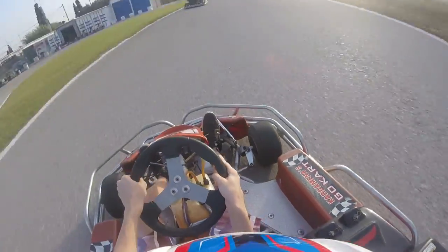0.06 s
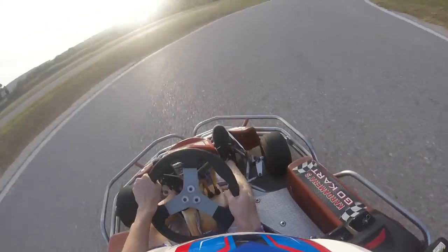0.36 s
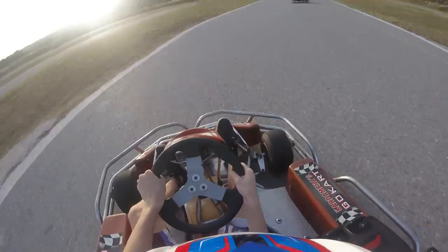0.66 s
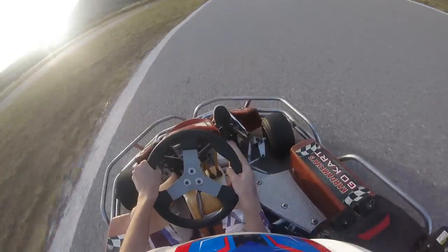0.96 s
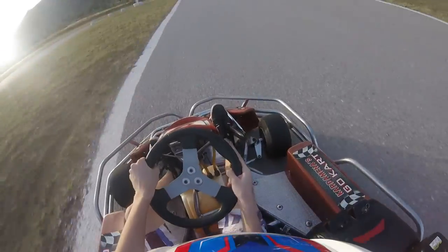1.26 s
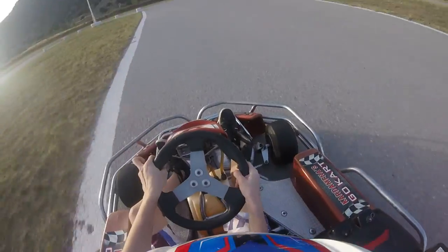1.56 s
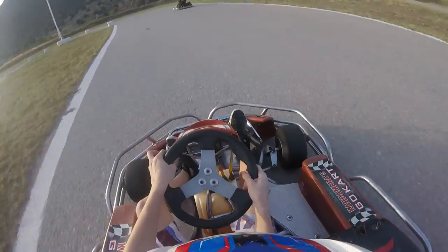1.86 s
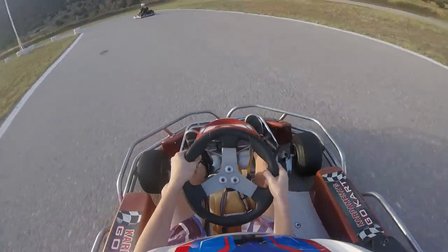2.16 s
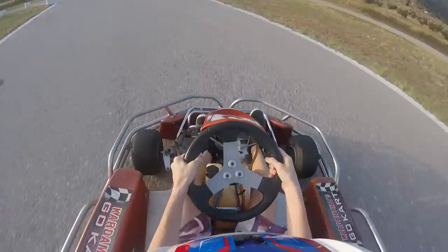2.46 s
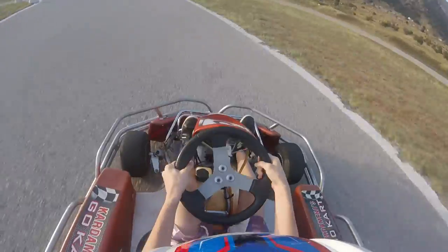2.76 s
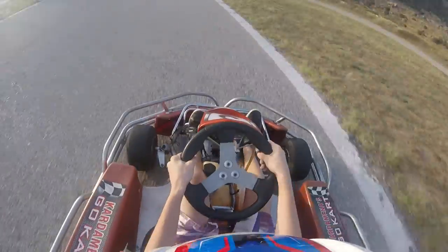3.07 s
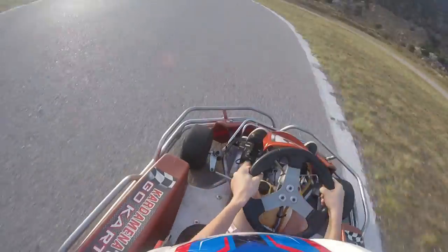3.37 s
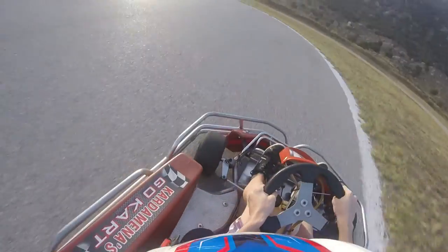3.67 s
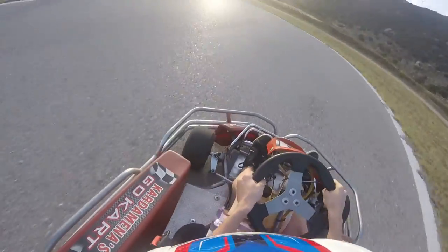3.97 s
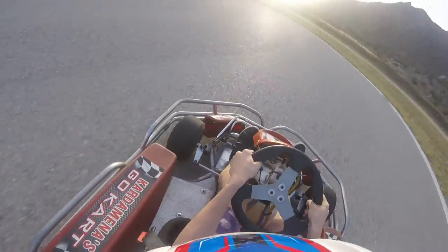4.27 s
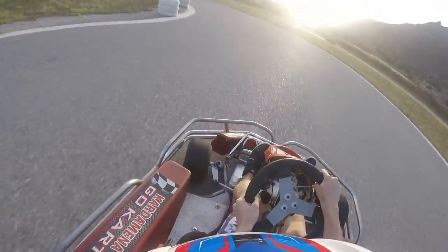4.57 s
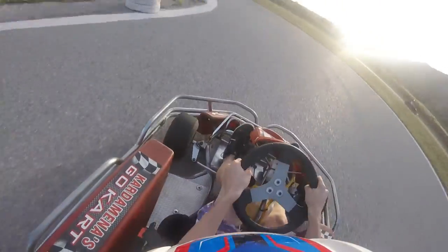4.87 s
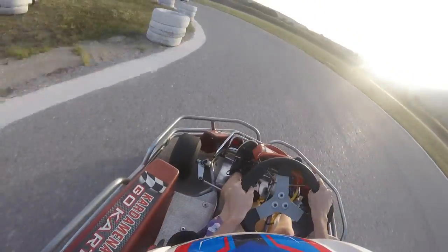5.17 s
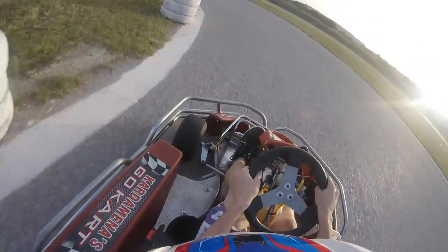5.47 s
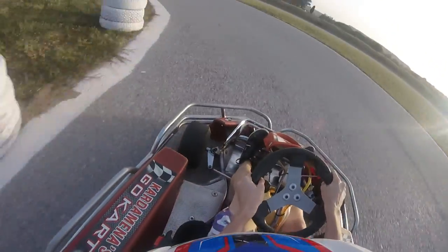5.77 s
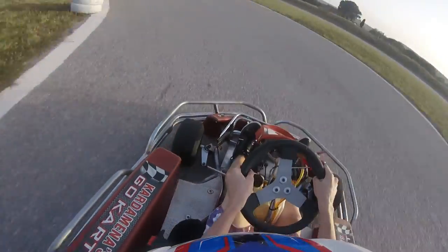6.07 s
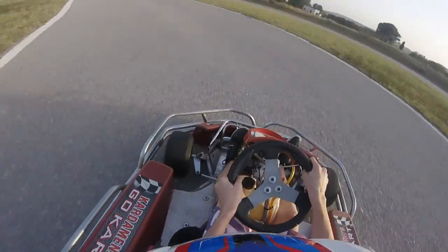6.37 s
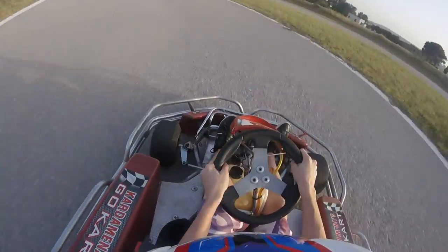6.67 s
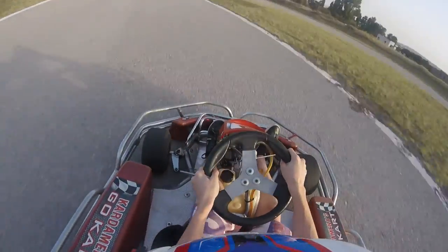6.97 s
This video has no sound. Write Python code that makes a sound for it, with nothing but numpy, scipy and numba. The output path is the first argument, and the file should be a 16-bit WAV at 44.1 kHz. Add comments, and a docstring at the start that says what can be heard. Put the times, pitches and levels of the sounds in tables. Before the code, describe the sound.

Wind rumbles and thumps over a close single-cylinder kart engine, its chain whining on and off with the throttle.

```python
"""A go-kart's single-cylinder four-stroke engine laps a track, heard from a camera on the driver's helmet.
Each cycle throbs in the exhaust, knocks the frame, honks in the air box and rattles the valve gear.
The drive chain sings under throttle and burbles when slack; jolts ring the metalwork.
Turbulent wind tumbles round the helmet, and its buffets push the camera's limiter down.
Near the start the sound drops out once with a faint tick."""
import sys
import numpy as np
from scipy import signal
from scipy.fft import rfft, irfft, next_fast_len
from scipy.io import wavfile
from scipy.ndimage import uniform_filter1d, minimum_filter1d
from numba import njit

SR = 44100
rng = np.random.default_rng(int(sys.argv[2]) if len(sys.argv) > 2 else 0)


def transcribe(u):
    """Save the signal u as a 16-bit wav file named by the first command-line argument.

    u: samples, shape (n,) or (channels, n), limited to [-1, 1]; the rate is SR.
    q: integer samples, one column per channel.
    """
    v = np.clip(np.atleast_2d(u).T, -1, 1)
    q = np.round(v * 32767).astype(np.int16)
    wavfile.write(sys.argv[1], SR, q)


N = 309141
T = np.arange(N) / SR

# engine speed: time_s, firing_hz
FIRING_RATE = [(0.0, 27.54), (0.26, 26.09), (0.59, 26.59), (0.8, 25.73), (1.44, 25.83), (1.65, 25.5),
               (2.48, 25.55), (3.06, 26.57), (3.45, 26.35), (3.89, 27.65), (4.09, 27.47), (4.57, 24.76),
               (4.9, 25.8), (5.19, 24.49), (5.45, 25.44), (5.72, 25.42), (5.94, 26.4), (7.0, 27.74)]
# engine load above cruising: time_s, load_db
ENGINE_LOAD = [(.09, 3.5), (.24, 0), (1.85, 3), (2.6, 1.5), (2.88, -1), (3.08, -2), (3.35, -3), (3.72, 0.5),
               (3.9, 0.5), (4.24, 2.5), (4.45, -2.5), (5.0, 1.5), (6.1, 3), (7.0, 1.5)]
# bends turn the helmet against the engine: time_s, bend_fraction (0 left-hand, 1 right-hand)
TRACK_BEND = [(0, 0.12), (2.4, 0), (3.8, 0.85), (7, 0.68)]
# presses of the throttle: open_s, close_s, whine_db
THROTTLE_PRESSES = [(-.1, 0.147, -22), (0.292, 0.365, -22.5), (0.411, 0.603, -23), (0.756, 1.434, -27),
                    (1.574, 2.304, -26.5), (2.968, 3.133, -25), (3.791, 4.125, -24), (4.097, 4.259, -26),
                    (4.898, 5.083, -26), (5.339, 5.66, -26.5), (6.002, 6.309, -23.5), (6.296, 7.089, -22)]
# harmonics of exhaust and crank at cruising load: firing_multiple, left_bend_db, right_bend_db
ENGINE_ORDERS = [(1, -25, -26.5), (2, -23.5, -19.5), (3, -41, -32), (4, -30.5, -27.5), (5, -34, -35),
                 (6, -37, -32.5), (7, -30, -33.5), (8, -35.5, -34.5), (10, -41.5, -34), (11, -34, -41),
                 (13, -34, -36.5), (14, -50, -37.5), (15, -32, -45), (17, -39, -39), (19, -45.5, -41),
                 (20, -43.5, -40), (21, -39.5, -40.5)]
# firing and valve blows within one cycle: place_turns, knock_gain_db, tick_gain_db
CYCLE_BLOWS = [(0.015, 6, -4.5), (0.23, 2.5, -12), (.47, 2.5, -14), (.68, 5.5, -8), (.87, 9, -3.5),
               (0.95, 10, 0.5)]
# resonances of frame, seat and silencer: pitch_hz, width_hz, gain_db
FRAME_MODES = [(355, 49, -6.5), (534, 88, 1), (686, 220, 1), (801, 123, 3.5), (991, 58, -4.5),
               (1215, 220, -10)]
# resonances of air box and inlet tube: pitch_hz, width_hz, gain_db
AIR_BOX_MODES = [(757.3, 60, -1.5), (869, 85, -5)]
# clatter spectrum at the helmet in a left and in a right bend: frequency_hz, gain_db
LEFT_CLATTER_SPECTRUM = [(900, 1.5), (1450, -11), (1800, -7), (2600, -5.5), (3000, -6), (3350, -5.5),
                         (3800, -13.5), (4450, -11.5), (5850, -16.5), (6600, -9), (7800, -19.5),
                         (8650, -14.5), (9600, -25.5), (13000, -28.5)]
RIGHT_CLATTER_SPECTRUM = [(900, -19), (1500, -1.5), (2000, -1), (2750, -8.5), (3050, -3.5), (3350, -2.5),
                          (3800, -14), (4800, -11), (5150, -10), (5900, -12.5), (6700, -10.5), (7800, -16),
                          (9200, -21.5), (10500, -25), (13000, -43)]
# resonances of the steel engine covers: pitch_hz, width_hz, left_gain_db, right_gain_db
COVER_MODES = [(2830, 89, -18, -26), (2964, 110, -16, -19), (3330, 130, -17, -19), (4400, 250, -20, -29),
               (5030, 130, -32, -17), (5310, 150, -32, -16), (7210, 120, -25, -33)]
# strength of the wind on the helmet: time_s, rumble_db, roar_db
WIND_LEVELS = [(0, -22.5, -17), (.25, -17, -24), (.6, -15.5, -20), (1.1, -9.5, -23), (1.38, -14.5, -21),
               (1.6, -14, -21), (2.2, -14.5, -22.5), (2.7, -11.5, -17.5), (3.35, -16.5, -21),
               (3.72, -14, -27.5), (4.1, -14.5, -22), (4.75, -13.5, -27.5), (5.2, -13.5, -24),
               (5.85, -15, -24), (6.2, -19.5, -22.5), (6.6, -27.5, -20), (7.0, -33, -22.5)]
# spectra of eddy rumble and of road and air roar: frequency_hz, gain_db
RUMBLE_SPECTRUM = [(10, -3.5), (20, 7.5), (35, -2.5), (55, -6), (85, -9.5), (130, -16), (250, -49),
                   (600, -82.5)]
ROAR_SPECTRUM = [(50, -1.5), (95, -3.5), (200, -1), (280, -2.5), (450, -7.5), (700, -7.5), (1000, -14),
                 (1400, -21), (2000, -40.5), (5000, -43), (12000, -65)]
# resonances of the heat shield and of the chain guard: pitch_hz, width_hz, gain_db
SHIELD_MODES = [(2820, 97, -6), (2978, 61, -3), (3087, 97, 0), (3320, 52, -8), (5130, 57, -9.5)]
GUARD_MODES = [(4330, 90, -10), (6500, 80, -3), (6700, 64, -3), (7000, 61, -11), (7340, 80, -8),
               (8500, 110, -10), (10000, 140, -13)]
# hits of the chain on its guard and jolts to the heat shield: start_s, level_db
GUARD_CHINKS = [(.053, -41), (.700, -38.5), (.790, -37), (1.821, -37), (4.216, -37), (4.282, -32.5),
                (4.844, -40), (5.405, -41), (6.081, -32), (6.133, -32), (6.565, -36)]
SHIELD_CLANKS = [(0.855, -33), (.935, -38), (1.242, -35), (1.321, -33), (1.514, -45), (3.069, -35.5),
                 (3.636, -34), (4.374, -37), (4.688, -31), (5.003, -30), (5.285, -39), (5.365, -36),
                 (5.72, -31), (6.101, -31), (6.476, -34), (6.769, -38)]
# pushes of wind on the helmet and eddies on the microphone, ahead of the limiter: peak_s, level_db
WIND_BUFFETS = [(0.226, -8), (.74, -7), (1.028, -3), (1.264, -3.5), (1.425, -3), (2.011, -2.5), (2.075, -5),
                (2.661, 2), (2.817, 2.5), (2.915, -1), (3.154, 1), (3.389, -7.5), (3.684, 3.5),
                (4.291, -2.5), (4.409, -9), (4.521, -7), (4.747, 1.5), (4.801, -10), (5.115, -0.5),
                (5.967, -3)]
EDDY_THUMPS = [(.813, -8), (.988, -10.5), (1.965, -14), (2.293, -8), (2.531, -6), (2.598, -7), (2.796, -10),
               (2.857, -1), (3.376, -10), (3.927, -14), (4.689, -10.5), (4.967, -11)]


def undb(db):
    """Amplitude grows tenfold for every 20 decibels."""
    return 10 ** (np.asarray(db) / 20)


def unit(x):
    """Normalisation to rms 1."""
    return x / np.sqrt(np.mean(x ** 2))


def curves(table):
    """Linear interpolation of each column in time."""
    times, *columns = np.transpose(table)
    return [np.interp(T, times, column) for column in columns]


def walk(rate_hz):
    """Slow random modulation: held values, smoothed twice, with a spread near 1."""
    hold = int(SR / rate_hz)
    steps = np.repeat(rng.standard_normal(N // hold + 1), hold)
    return 1.3 * uniform_filter1d(uniform_filter1d(steps, hold), hold)[:N]


def colour(x, spectrum):
    """Filtering by multiplication in the frequency domain; rms 1."""
    hz, db = np.transpose(spectrum)
    size = next_fast_len(N + 4096)
    bin_hz = np.arange(size // 2 + 1) * SR / size
    gain = undb(np.interp(np.log(bin_hz + 1), np.log(hz), db))
    return unit(irfft(rfft(x, size) * gain, size)[:N])


def ring(x, hz, width_hz):
    """A second-order resonator, gain 1 at its centre."""
    return signal.lfilter(*signal.iirpeak(hz, hz / width_hz, fs=SR), x)


def cut(x, hz, kind, order):
    """A maximally flat low-pass or high-pass filter."""
    return signal.sosfilt(signal.butter(order, hz, kind, fs=SR, output="sos"), x)


def strikes(cycle, place, jitter_s, scatter_db):
    """A quasi-periodic impulse train: one blow a cycle, a little off in time and size."""
    turns = np.arange(1, int(cycle[-1])) + place
    timing, size = rng.standard_normal((len(turns), 2)).T
    samples = (np.interp(turns, cycle, T) + jitter_s * timing) * SR
    return np.bincount(np.clip(samples.astype(int), 0, N - 1), undb(scatter_db * size), N)


def throttle(closed_db=-30, open_s=0.0449, close_s=0.019):
    """The envelope of the engine's pull: each press rises linearly, holds and decays exponentially."""
    pull = undb(closed_db)
    for opens, closes, db in THROTTLE_PRESSES:
        press = np.clip((T - opens) / open_s, 0, 1) * np.exp(-np.maximum(T - closes, 0) / close_s)
        pull = np.maximum(pull, undb(db) * press)
    return pull


def slackness(pull, taut_db=-20.5):
    """Chain tension follows the pull: 0 is fully taut, 1 fully slack."""
    return np.clip(1 - pull / undb(taut_db), 0, 1)


def throb(cycle, bend, pull, crest_turns=0.0827, wobble_turns=0.0058, overrun_turns=0.036):
    """Superposition: harmonics crest just after each firing; two crank turns a cycle favour the second."""
    out = 0
    for order, left_db, right_db in ENGINE_ORDERS:
        lag = crest_turns + 0.017 * rng.standard_normal()
        db = left_db + bend * (right_db - left_db) + 1.36 * walk(5.7)
        # uneven firing shakes the higher orders most; off the throttle the firings stumble
        wobble = wobble_turns * np.sqrt(order) * walk(12)
        stumble = overrun_turns * order * slackness(pull) ** 2 * walk(26)
        phase = order * (cycle - lag) + wobble + stumble
        out = out + undb(db) * np.sqrt(2) * np.cos(2 * np.pi * phase)
    return out


def frame_knocks(cycle, rattle_s=0.027):
    """Impulse excitation: firing and valve blows ring the frame, with a loose rattle after each."""
    blows = sum(undb(db) * strikes(cycle, place, jitter_s=0.00017, scatter_db=2.5)
                for place, db, _ in CYCLE_BLOWS)
    rattle = signal.lfilter([1], [1, -np.exp(-1 / (rattle_s * SR))], blows) * rng.standard_normal(N)
    force = undb(-3) * unit(blows) + unit(rattle)
    frame = sum((-1) ** k * undb(db) * ring(force, hz, width)
                for k, (hz, width, db) in enumerate(FRAME_MODES))
    return unit(cut(frame, hz=1535, kind="low", order=7))


def chain_whine(firing_hz, cycle, pull, links_per_firing=27.94, slack_sag=0.07):
    """A meshing tone: links meet the sprocket in a steady note when taut, a lower burble when slack."""
    slack = slackness(pull)
    links = np.cumsum(links_per_firing * firing_hz * (1 - slack_sag * slack ** 3)) / SR
    wander_turns = 0.09 * walk(60) + 0.8 * slack ** 2 * walk(50)  # links stray from even spacing
    surge = 1 + 0.41 * np.cos(2 * np.pi * (cycle - 0.41))  # the pull swells once a cycle
    return unit(np.cos(2 * np.pi * (links + wander_turns)) * surge * undb(walk(49)))


def intake_honk(cycle, rebound_db=-9, rush_db=8.5):
    """Cavity resonance: two gulps a cycle kick the air box, and rushing air keeps it ringing."""
    gulp = strikes(cycle, place=-0.03, jitter_s=0.00015, scatter_db=1.2)
    rebound = undb(rebound_db) * strikes(cycle, place=0.5, jitter_s=0.00015, scatter_db=1.2)
    flow = unit(gulp + rebound) + undb(rush_db) * rng.standard_normal(N)
    return unit(sum(undb(db) * unit(ring(ring(flow, hz, width), hz, 2 * width))
                    for hz, width, db in AIR_BOX_MODES))


def clatter(cycle, bend, hiss_left_db=-5, hiss_right_db=-6.5, rise_turns=0.0077, decay_turns=0.17):
    """Incoherent sources add in power: metal ticks from each blow over the hiss of chain and fan."""
    power = undb(hiss_left_db + bend * (hiss_right_db - hiss_left_db)) ** 2
    for place, _, db in CYCLE_BLOWS:
        age = (cycle - place) % 1
        tick = (1 - np.exp(-age / rise_turns)) * np.exp(-age / decay_turns)
        power = power + (undb(db + 2 * walk(26)) * tick) ** 2
    envelope = np.sqrt(power)
    grit = envelope * rng.standard_normal(N) * undb(0.4 * walk(1500))
    # the helmet shades the ticks as it turns
    ticks = (1 - bend) * colour(grit, LEFT_CLATTER_SPECTRUM) + bend * colour(grit, RIGHT_CLATTER_SPECTRUM)
    covers = 0
    for hz, width, left_db, right_db in COVER_MODES:
        db = left_db + bend * (right_db - left_db) + 2 * walk(14)  # loose covers buzz on and off
        covers = covers + undb(db) * unit(ring(envelope * rng.standard_normal(N), hz, width))
    return ticks + covers


def wind(steady_s=0.12):
    """Turbulence is broadband: eddies rumble at the microphone; tyres and air roar above them."""
    rumble_db, roar_db = curves(WIND_LEVELS)
    rumble = colour(rng.standard_normal(N), RUMBLE_SPECTRUM)
    running_rms = np.sqrt(uniform_filter1d(rumble ** 2, int(steady_s * SR)))
    roar = colour(rng.standard_normal(N) * undb(1.2 * walk(40)), ROAR_SPECTRUM)
    return rumble / running_rms * undb(rumble_db) + roar * undb(roar_db)


def struck_metal(hits, modes, detune_share=0.014, scatter_db=4, rise_s=0.0011):
    """Free vibration in damped modes: no two hits land on the same spot, so each has its own mix."""
    hz, width, mode_db = np.transpose(modes)[:, :, None]
    age = np.arange(SR // 20) / SR
    decay = np.exp(-np.pi * width * age) * (1 - np.exp(-age / rise_s))
    out = np.zeros(N + len(age))
    for start_s, db in hits:
        detune, size, phase = rng.standard_normal((3, len(modes), 1))
        gain = undb(mode_db + scatter_db * size)
        tones = np.sin(2 * np.pi * (hz * (1 + detune_share * detune) * age + phase))
        ringing = np.sum(gain * decay * tones, axis=0) / np.sqrt(np.sum(gain ** 2) / 2)
        start = int(np.clip(start_s * SR, 0, N))
        out[start:start + len(age)] += undb(db) * ringing
    return out[:N]


def metalwork(cycle, bend, load_db, tap_db=-45.5, right_bend_db=5, tap_turns=0.01):
    """Impact sound: firings tap the heat shield; jolts clank it and throw the chain against its guard."""
    times = np.interp(np.arange(1, int(cycle[-1]) + 1) + tap_turns, cycle, T)
    levels = np.interp(times, T, tap_db + right_bend_db * bend + load_db)
    levels += 2 * rng.standard_normal(len(times))
    taps = struck_metal(zip(times, levels), SHIELD_MODES)
    return taps + struck_metal(SHIELD_CLANKS, SHIELD_MODES) + struck_metal(GUARD_CHINKS, GUARD_MODES)


def buffets(rise_s=0.005, fall_s=0.034):
    """Pressure pulses, largely infrasonic: each push of air hits fast and ebbs."""
    return sum(undb(db) * np.exp(-np.where(T < peak_s, ((T - peak_s) / rise_s) ** 2, (T - peak_s) / fall_s))
               for peak_s, db in WIND_BUFFETS)


def thumps(pitch_hz=90, pitch_spread=0.12, half_width_s=0.008):
    """Wave packets: an eddy breaking on the microphone is a cycle or two of low pressure swing."""
    out = 0
    for peak_s, db in EDDY_THUMPS:
        stretch, phase = rng.standard_normal(2)
        age = T - peak_s
        swing = np.cos(2 * np.pi * (pitch_hz * np.exp(pitch_spread * stretch) * age + phase))
        out = out + undb(db) * swing * np.exp(-(age / half_width_s) ** 2)
    return out


@njit
def follow_peaks(x, attack_s, release_s):
    """Envelope detection: a first-order lag with one time constant rising and another falling."""
    out, level = np.empty(len(x)), 0.
    for i in range(len(x)):
        level += (x[i] - level) / (SR * (attack_s if x[i] > level else release_s))
        out[i] = level
    return out


def scene():
    """Phase locking: one crank times the engine's sounds, and the wind adds to them."""
    firing_hz, = curves(FIRING_RATE)
    load_db, = curves(ENGINE_LOAD)
    bend, = curves(TRACK_BEND)
    pull = throttle()
    cycle = 0.39 + np.cumsum(firing_hz) / SR  # phase in turns, one turn per firing
    # harder firing strengthens the throb a little, the knocks and the clatter in full
    engine = throb(cycle, bend, pull) * undb(0.22 * load_db)
    engine += frame_knocks(cycle) * undb(-24.5 + load_db)
    engine += (chain_whine(firing_hz, cycle, pull) + undb(-3.5) * intake_honk(cycle)) * pull
    engine += clatter(cycle, bend) * undb(-42 + load_db)
    engine += metalwork(cycle, bend, load_db)
    return (engine + wind() + buffets() + thumps())[None]


def record(dry, threshold=0.5, ceiling=0.76, dropout_s=0.145, top_hz=13400):
    """Limiting: the camera ducks on pressure peaks, holds a ceiling and cuts the deepest bass and the top."""
    envelope = follow_peaks(np.abs(dry[0]), attack_s=0.0017, release_s=0.06)
    ducked = cut(dry / np.maximum(envelope / threshold, 1), hz=13.6, kind="high", order=4)
    headroom = ceiling / np.maximum(np.abs(ducked[0]), ceiling)
    limited = ducked * uniform_filter1d(minimum_filter1d(headroom, size=201), size=201)
    # the sound drops out once with a faint tick and fades straight back
    age = T - dropout_s
    fade = np.clip(np.maximum(-age / 0.001, age / 0.012), 0, 1)
    tick = undb(-18) * (age >= 0) * np.exp(-np.abs(age) / 0.0001)
    low_pass = signal.ellip(8, 0.2, 70, top_hz, fs=SR, output="sos")
    return signal.sosfilt(low_pass, limited * fade + tick)


dry = scene()
out = record(dry)
transcribe(out)
```